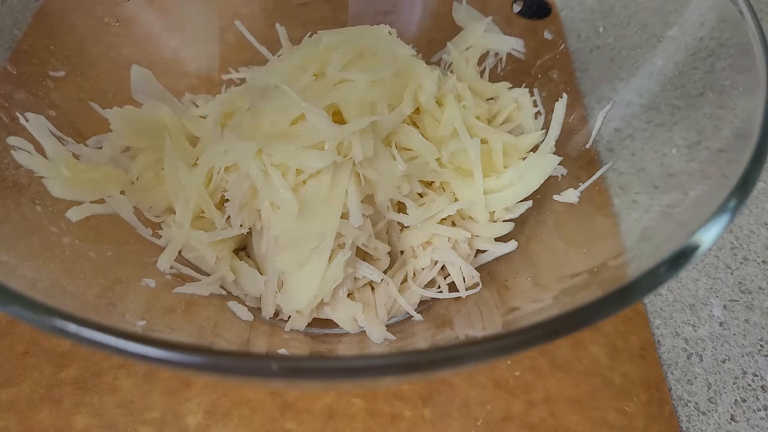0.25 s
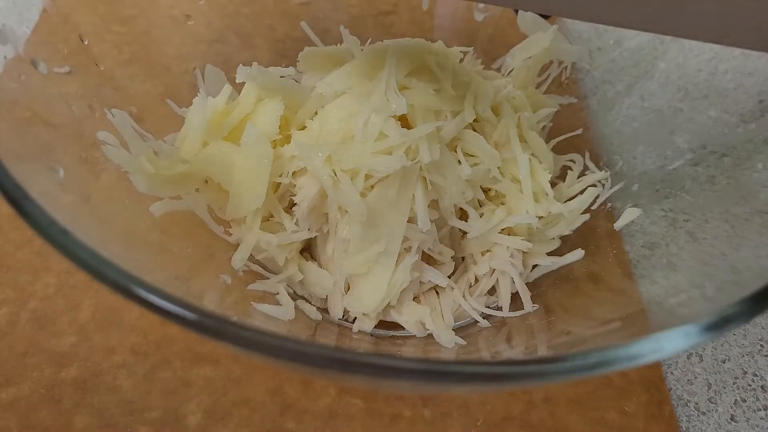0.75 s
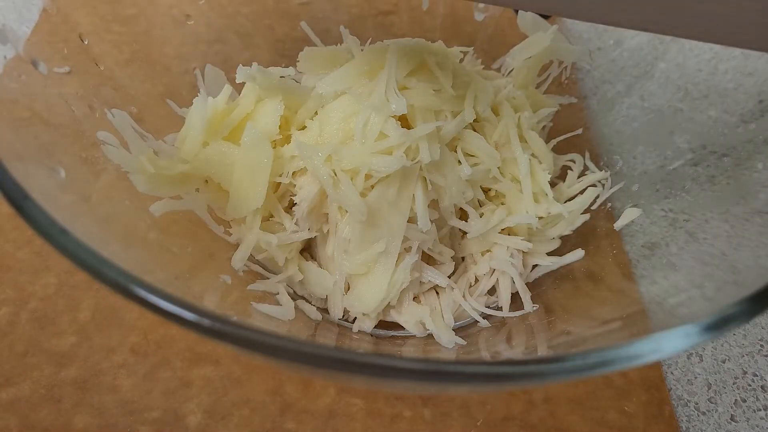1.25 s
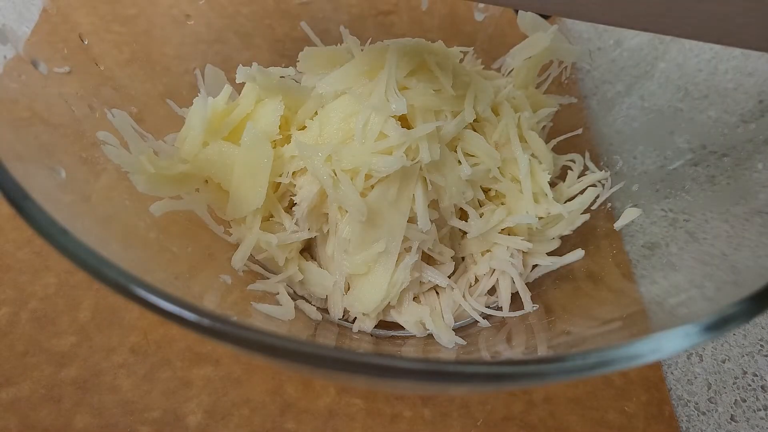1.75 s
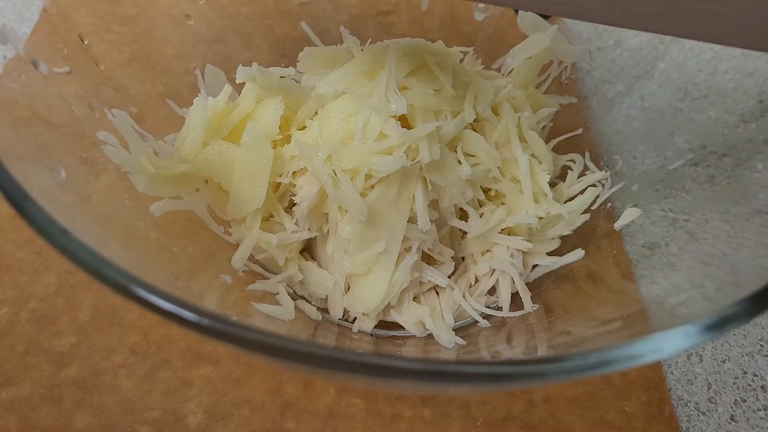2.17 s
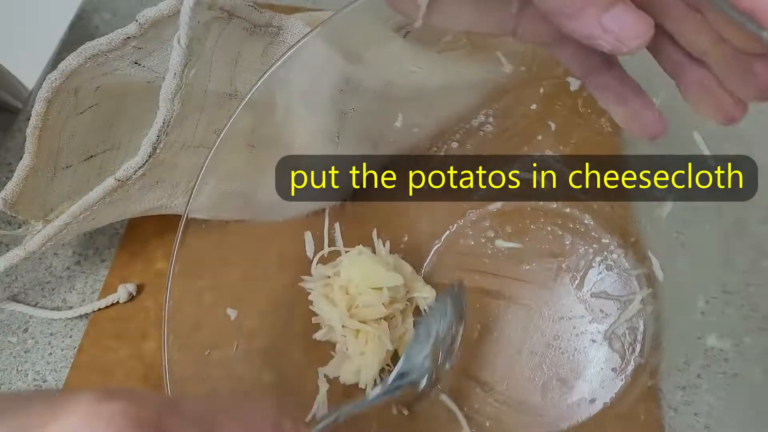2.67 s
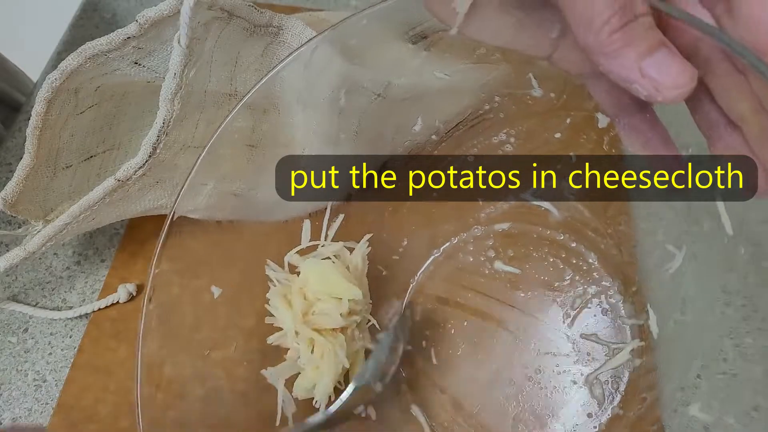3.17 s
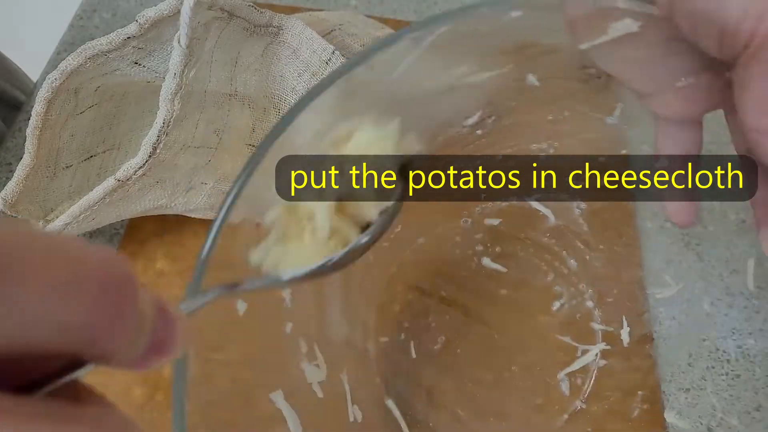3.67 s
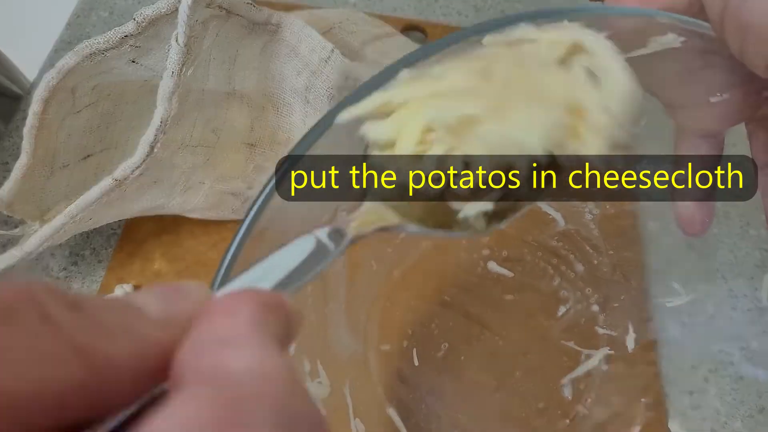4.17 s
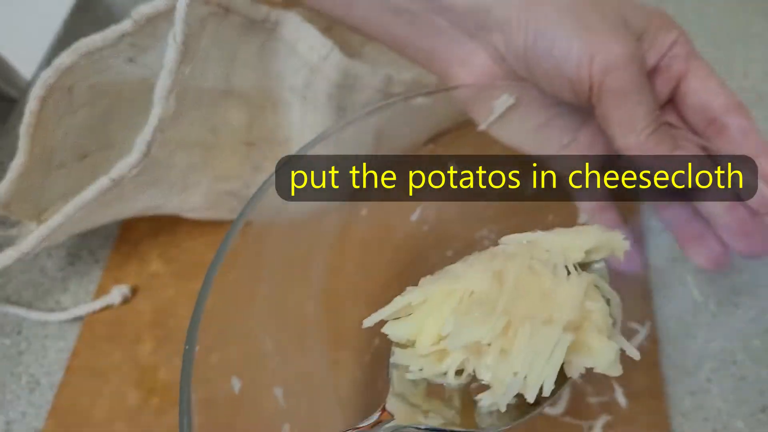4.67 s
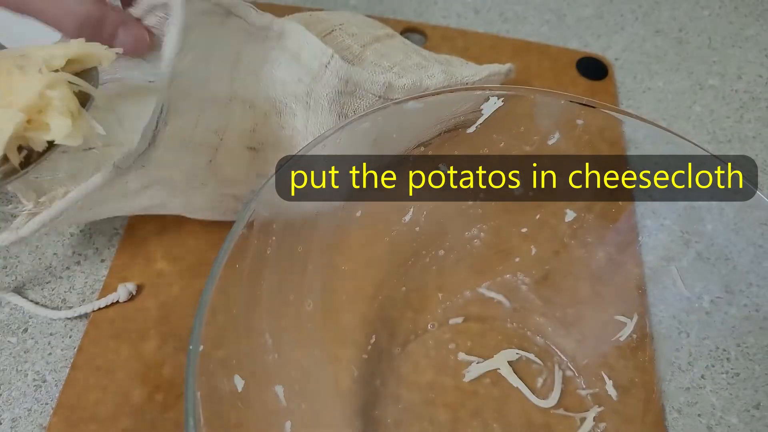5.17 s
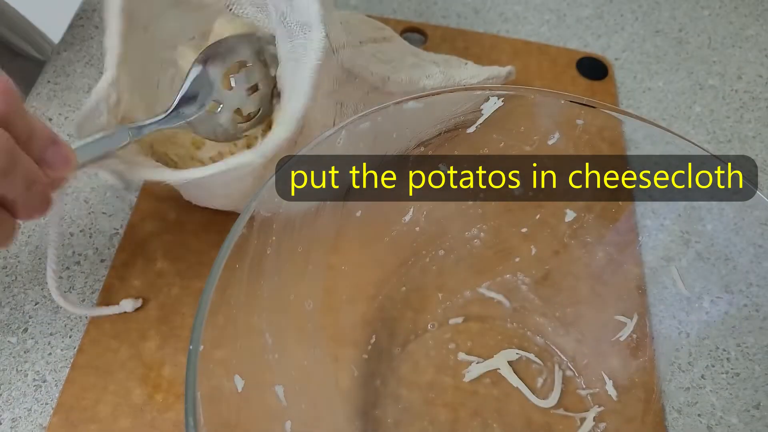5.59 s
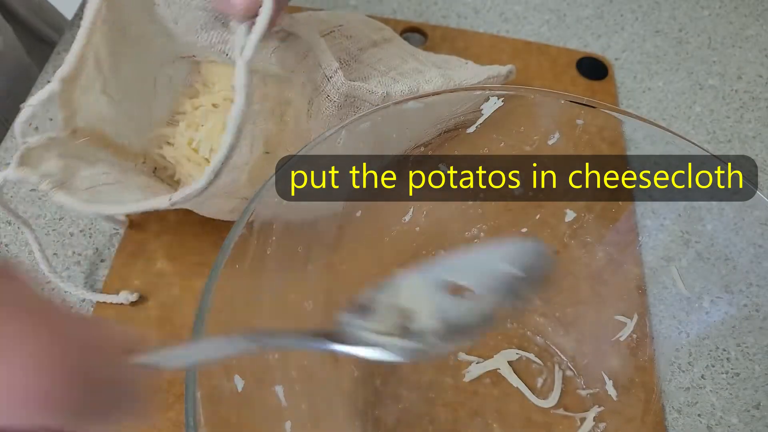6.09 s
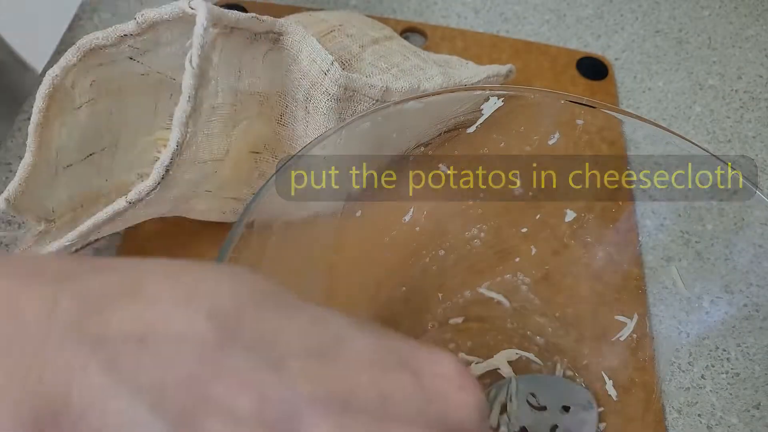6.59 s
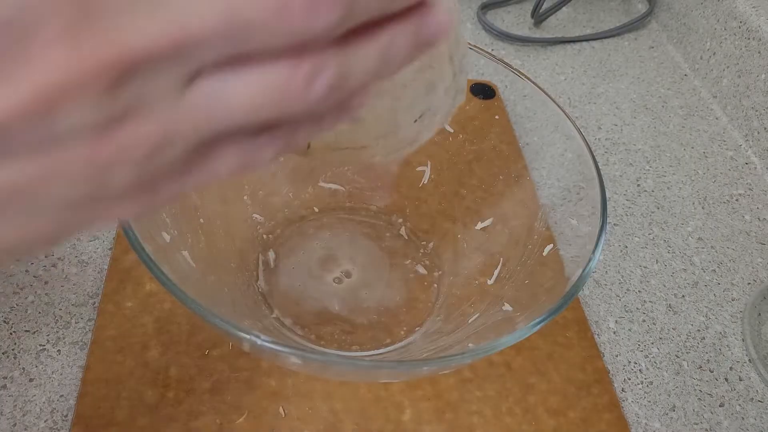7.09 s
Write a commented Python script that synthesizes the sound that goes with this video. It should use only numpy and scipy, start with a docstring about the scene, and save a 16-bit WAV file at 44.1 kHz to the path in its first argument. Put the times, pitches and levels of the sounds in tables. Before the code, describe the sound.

A very short run of quick, crisp potato-slicing strokes cuts off into quiet kitchen air with faint rustles and two tiny knocks. After a brief silence, a steel spoon taps sharply and scrapes in a glass bowl. The bowl drags over a wooden board and lands with a dull thud while water hisses softly. The spoon drops with a bright rattle, then faint drips. Close stereo microphone, small room.

```python
"""Quick slicer strokes, then near stillness; a steel spoon taps and scrapes a glass bowl on a wooden board,
the bowl is dragged and set down, a tap hisses and the spoon drops in; a quiet kitchen with drips ends it.
Steel, glass and wood are struck resonators. Blades, friction, clatter, water and air are shaped noise.
Three passages, each with its own air; a short silence parts the first two."""
import sys
import numpy as np
from scipy import signal
from scipy.fft import rfft, irfft, next_fast_len
from scipy.io import wavfile
from scipy.ndimage import uniform_filter1d

SR = 44100
rng = np.random.default_rng(int(sys.argv[2]) if len(sys.argv) > 2 else 0)


def to_wav(s):
    """Save 16-bit WAV."""
    ch = np.atleast_2d(s).T  # columns
    pcm = np.round(np.clip(ch, -1, 1) * 32767)  # PCM
    wavfile.write(sys.argv[1], SR, pcm.astype(np.int16))


def volts_from_decibels(level):
    """Turn decibel levels (scalar or array-like) into linear amplitude factors."""
    exponent = np.asarray(level, float) / 20
    return 10 ** exponent


N = 323694
T = np.arange(N) / SR

# The three passages. Each row: start in seconds, end in seconds.
PASSAGES = [(0, 2.172), (2.298, 6.72), (6.72, 7.4)]
# Stereo image of close sounds. Each row: frequency in Hz, left-right likeness from -1 to 1,
# left minus right in dB.
CLOSE_STEREO = [(120, 0.99, -3), (250, 0.88, -5), (453, -.1, 2), (960, -0.63, -0.5), (1350, -0.62, 3),
                (2000, -0.067, -1)]
# Stereo image with left and right nearly unrelated. Columns as above.
WIDE_STEREO = [(120, 0.09, -2), (2000, 0.0049, 0)]

# Kitchen air, one noise colour per passage. Each row: frequency in Hz, relative density in dB.
AIR_COLOURS = [
    [(12, -67), (25, -27), (113, -4.5), (181, -16.5), (227, -3), (326, -19), (364, -6), (602, -20),
     (1210, -25), (1790, -31.5), (1940, -19), (2110, -34.5), (2500, -23.5), (2790, -35), (15800, -53)],
    [(12, -40), (20, -10), (85, -0.5), (227, -9), (291, -5), (335, -26), (385, -8.5), (539, -7),
     (995, -14.5), (2300, -29), (15800, -44.5)],
    [(12, -43), (20, -16), (53, -7.5), (85, -7.5), (227, -9), (308, -21), (375, -13), (753, -9),
     (995, -19.5), (1890, -21), (4130, -38), (10400, -42.5), (15800, -53)],
]
# Level of that air in dB, one per passage.
AIR_LEVELS = [-55, -50, -49]
# Faint whistle of the first passage. Each row: frequency in Hz, relative level in dB,
# ring time (fall by 60 dB) in seconds, radians by which the left leads.
WHISTLE_MODES = [(9070, -46, .03, 0.98)]
# Slicer strokes. Each row: middle in seconds, level in dB.
STROKES = [(.003, -30.5), (.049, -31.5), (.095, -24), (.15, -28), (.188, -27), (.203, -25), (.225, -30.5),
           (.271, -29)]
# Colour of the blades. Each row: frequency in Hz, relative density in dB.
BLADE_COLOUR = [(180, -54.5), (300, -24), (391, -12), (439, -20.5), (633, -1), (747, -17.5), (1170, -8.5),
                (2160, -7), (3160, -3), (7600, -12), (8830, -9), (12500, -11), (15800, -16)]
# Rustles of hands and cloth. Each row: middle in seconds, level in dB, half length in seconds,
# centre in Hz, width in Hz (band edges are held within 200 to 16000 Hz).
RUSTLES = [(0.479, -65.5, .01, 2960, 2980), (0.792, -55, 0.032, 2600, 1000), (0.819, -52, .008, 2430, 2940),
           (1.305, -59, .005, 3200, 1500), (1.418, -56.5, 0.011, 2000, 1500), (1.601, -62, .01, 2300, 1000),
           (2.454, -62, .02, 8920, 7950), (5.19, -41, .014, 9000, 14100),
           (5.181, -53.5, 0.0055, 12760, 1200), (5.246, -41, .022, 5980, 11960),
           (5.24, -37, 0.0058, 12770, 1215), (7.268, -62.5, .03, 10930, 6000)]
# Small knocks. Each row: time in seconds, strike in dB, pitch in Hz, ring time in seconds.
KNOCKS = [(1.013, -36, 408, .045), (1.468, -39, 1955, .02)]
# Drips of juice into the bowl. Each row: time in seconds, strike in dB.
DRIPS = [(6.829, -37), (7.010, -42), (7.082, -43), (7.186, -42), (7.222, -44), (7.274, -42)]

# Resonances of the spoon's scoop, ringing free. Each row: frequency in Hz, relative level in dB,
# ring time in seconds, radians by which the left leads.
SCOOP_MODES = [(1340, -15, .12, 2.0), (3984, 0, .17, -.5), (5330, -26, .07, -0.5), (6515, -5, .14, 0.83),
               (7300, -17, 0.13, 3.5), (8400, -16, .14, -2), (10300, -17, .14, -2.5),
               (11360, -27.5, .1, 1.0), (12930, -27.5, .12, 2)]
# Resonances of the spoon's handle, the bowl's rim and the bowl's base. Columns as for the scoop.
HANDLE_MODES = [(6230, 1.5, 0.076, 4), (8690, -8, 0.12, 1.7), (8840, -0.5, 0.09, 0), (9230, -2, .07, 3.65),
                (10200, -15, .12, -5.9), (11740, -14, .1, -5.5), (12660, -10, .06, 0.9),
                (13590, -16, .1, -3.5)]
RIM_MODES = [(2322, 1.5, 0.11, 1.2), (2300, -14, .2, 1.5), (3305, -11, .16, -1.5), (4322, -12, 0.2, 1.5),
             (5545, -15, 0.18, 0), (6900, -12.5, .2, 3), (7360, -15, .17, -0.5), (8170, -13.5, 0.18, 1)]
BASE_MODES = [(405, -12, .15, -1.83), (614.7, 7.5, 0.045, 1.65), (900, -4, 0.025, -1.8),
              (1191, -5, 0.043, -1), (1314, 0, .07, 3.5), (1720, -11.5, .05, 2.13), (2070, -17, .03, 1)]
# Resonances of the wooden board, before any damping by the hand. Columns as for the scoop.
BOARD_MODES = [(57, -4, 0.18, .1), (99, -6, .1, .1), (122, 3, .17, 0.53), (188, -12.5, 0.11, 0.21),
               (249.8, -10, .07, .1), (330, -6, .07, -0.1)]
# The whole bowl, woken only when it lands. Columns as for the scoop.
WHOLE_BOWL_MODES = [(428, -17, .8, -1.6)]
# Squeak of the scoop's edge. Columns as for the scoop.
SQUEAK_MODES = [(1350, 0, .03, -.3), (2000, -2, .03, 2.0), (2600, 0, .02, 2.0), (4450, -9, .02, -.3),
                (5600, -13, .02, -.9)]
# The pressed or loaded scoop: free from seconds, free until seconds, pitch of its main mode when
# pressed in Hz, share of ring time when pressed, muffling once loaded in dB.
PRESSED_SCOOP = (3.0, 3.4, 4064, .55, -10)
# Spoon taps. Each row: time in seconds, then drive of crack, scoop and base in dB.
TAPS = [(2.3033, -63, -60, -64), (2.4153, -58, -63, -45), (2.4564, -52, -48, -36), (2.6678, -9, -19, -17.5),
        (2.7571, -16, -12, -24.5), (2.8282, -26, -36, -46), (2.8453, -6, -34, -23),
        (3.1234, -9.5, -22, -20.5), (3.1882, -1, -11, -22), (3.4629, -12, -41, -29),
        (3.5581, -58, -64, -65), (3.6194, -50, -62, -70), (3.6671, -58, -60, -65),
        (3.7141, -54, -49.5, -61), (3.7992, -40.5, -44.5, -59)]
# Colour of contact cracks and friction. Each row: frequency in Hz, relative density in dB.
CRACK_COLOUR = [(200, -20), (600, -7.5), (1400, -2), (2800, -7), (6500, -20), (10000, -34), (16000, -46)]
# Colour of the treble tick. Each row: frequency in Hz, relative density in dB.
TICK_COLOUR = [(3000, -30), (6800, 0), (10500, -6), (16000, -24)]
# Scrapes on wet glass. Each row: peak in seconds, drive of the ring in dB, friction in dB,
# fading in dB per second.
SCRAPES = [(2.338, -65, -72, 600), (2.456, -64, -64, 250), (2.86, -50, -40, 400), (2.9, -50, -52, 400),
           (3.14, -46, -42, 200), (3.186, -42, -36, 500), (3.49, -76, -48, 200), (3.628, -62, -65, 200),
           (3.72, -66, -64, 200), (3.806, -61, -55, 250), (4.182, -68, -44, 350), (4.4, -64, -47, 200),
           (4.485, -62, -44, 120), (4.545, -64, -48, 300)]
# One squeak: middle in seconds, drive in dB, half length in seconds.
SQUEAK = (4.182, -61, .013)
# Low rumble while the hands work. Each row: time in seconds, level in dB.
RUMBLE_LEVEL = [(2.3, -70), (2.7, -58), (2.86, -50), (3.15, -58), (3.4, -47), (3.85, -50), (4.13, -60),
                (4.4, -42), (4.7, -52), (5.1, -53), (5.55, -62), (5.82, -51), (6.0, -66), (6.5, -60),
                (6.72, -65)]
# Bowl dragged over the board: peak in seconds, level in dB, rise and fall in dB per second,
# average slips per second.
DRAG = (4.39, -29, 105, 60, 95)
# Bowl set down: time in seconds, then base, board and dull rush in dB, rush fading time in seconds.
SET_DOWN = (4.7228, -13, -9.5, -19, .025)
# Colour of the dull rush. Each row: frequency in Hz, relative density in dB.
RUSH_COLOUR = [(150, -18), (400, -1), (700, 2.5), (1500, -6), (3400, -19), (4500, -39), (9000, -60)]
# Tap in the sink: fully open at seconds, closing from seconds, level in dB, opening and closing
# in dB per second.
TAP_FLOW = (4.68, 5.3, -47, 85, 9)
# Colour of the water. Each row: frequency in Hz, relative density in dB.
STREAM_COLOUR = [(590, -24.5), (1000, -4), (1120, -13), (1350, 1), (1550, -8), (2270, -4), (2550, -8.5),
                 (3400, -4.5), (4430, -8.5), (12700, -5), (15800, -16.5)]
# Spoon drops and bounces. Each row: time in seconds, then drive of handle, rim and base in dB.
DROPS = [(6.388, -17, -29, -19), (6.399, -14, -28, -18), (6.536, -42, -42, -55), (6.545, -29, -28, -45),
         (6.552, -10, -7, -28), (6.575, -16.5, -20, -35)]
# Colour of steel clattering on glass. Each row: frequency in Hz, relative density in dB.
CLATTER_COLOUR = [(500, -31.5), (1400, -9), (3300, -5), (4700, -9), (6300, 0), (7900, -9.5), (9200, -6),
                  (13000, -9), (16000, -15.5)]


def column(table, count, at, bend=np.asarray):
    """Reads one column of a table at the places `at`, straight between rows on the bent axis."""
    table = np.array(table, float)
    return np.interp(bend(at), bend(table[:, 0]), table[:, count])


def gain_curve(table, count):
    """Turns a dB column into gain, silent outside its span."""
    return volts_from_decibels(column(table, count, T)) * (T >= table[0][0]) * (T <= table[-1][0])


def walk(rate):
    """Slow chance with spread near 1: random steps at `rate` per second, smoothed twice."""
    k = int(SR / rate)
    steps = np.repeat(rng.standard_normal(N // k + 1), k)
    return 1.3 * uniform_filter1d(uniform_filter1d(steps, k), k)[:N]


def hump(s, half):
    """A bell-shaped swell."""
    return np.exp(-.5 * ((T - s) / half) ** 2)


def swell(start, end, db, rise_db, fall_db):
    """A level that climbs to `start`, holds to `end` and sinks, straight in dB per second."""
    return volts_from_decibels(db - rise_db * np.maximum(start - T, 0) - fall_db * np.maximum(T - end, 0))


def noise(colour, stereo, flicker_db=0.):
    """Coloured stereo noise of rms 1; with flicker, each octave wavers on its own."""
    size = next_fast_len(N)
    hz = np.maximum(np.arange(size // 2 + 1) * SR / size, 1)
    like = np.clip(column(stereo, 1, hz, np.log), -1, 1)
    lean = volts_from_decibels(column(stereo, 2, hz, np.log) / 2)
    a, b = rfft(rng.standard_normal((2, size)))
    left = a * lean
    right = (like * a + np.sqrt(1 - like ** 2) * b) / lean
    pair = np.array([left, right]) * volts_from_decibels(column(colour, 1, hz, np.log))
    if flicker_db:
        octave = np.clip(np.log2(hz / 60), 0, 8)
        out = np.zeros((2, N))
        for k in range(9):
            band = pair * np.clip(1 - abs(octave - k), 0, 1)  # overlapping octaves sum to the whole
            out += irfft(band, size)[:, :N] * volts_from_decibels(flicker_db * walk(9.9))
    else:
        out = irfft(pair, size)[:, :N]
    return out / out.std()


def ring(push, modes):
    """Damped resonators driven by a push, each with its own phase and balance left and right."""
    out = np.zeros((2, len(push)))
    for hz, db, t60, lead in modes:
        pole = np.exp((2j * np.pi * hz - np.log(1000) / t60) / SR)
        z = signal.lfilter([volts_from_decibels(db)], [1, -pole], push)
        lean = np.log(volts_from_decibels(column(CLOSE_STEREO, 2, hz, np.log))) + 1j * lead
        out += (z * np.exp(.5 * lean * np.array([[1], [-1]]))).imag
    return out


def blows(times, levels_db, contact_s):
    """Contact pushes and their envelopes: a first touch, then chatter that dies over the contact time."""
    push, shape = np.zeros((2, N + SR))
    fade = np.exp(-np.arange(SR // 5) / SR / contact_s)
    chatter_share = .3  # of each push's unit energy, before its level
    for s, db in zip(times, levels_db):
        chatter = fade * rng.standard_normal(len(fade))
        chatter *= np.sqrt(chatter_share / np.sum(chatter ** 2))
        chatter[0] = np.sqrt(1 - chatter_share)
        at = slice(int(s * SR), int(s * SR) + len(fade))
        push[at] += volts_from_decibels(db) * chatter
        shape[at] += volts_from_decibels(db) * fade
    return push[:N], shape[:N]


def soften(push):
    """Thick glass and wood take blows without treble."""
    return signal.sosfilt(signal.butter(3, 3300, fs=SR, output="sos"), push)


def room(x, db=-17):
    """Kitchen tail: fading noise, the treble fading sooner, unrelated left and right."""
    t = np.arange(SR // 2) / SR
    low_t60_s, high_t60_s = 0.37, 0.3
    low, high = rng.standard_normal((2, 2, len(t)))
    low = signal.sosfilt(signal.butter(2, [250, 2500], "band", fs=SR, output="sos"), low)
    high = signal.sosfilt(signal.butter(2, 2500, "high", fs=SR, output="sos"), high)
    tail = low * 1000 ** (-t / low_t60_s) + high * 1000 ** (-t / high_t60_s)
    tail *= np.minimum(t / .004, 1)
    tail /= np.sqrt(np.sum(tail ** 2) / 2)
    return x + volts_from_decibels(db) * signal.fftconvolve(x, tail, axes=1)[:, :N]


def kitchen_air():
    """Steady coloured noise for each passage, its octaves wavering slightly."""
    images = (WIDE_STEREO, CLOSE_STEREO, CLOSE_STEREO)
    return [volts_from_decibels(db) * noise(colour, stereo, flicker_db=0.5)
            for colour, db, stereo in zip(AIR_COLOURS, AIR_LEVELS, images)]


def faint_whistle():
    """A narrow resonator kept sounding by noise."""
    return volts_from_decibels(-60) * ring(rng.standard_normal(N), WHISTLE_MODES)


def slicer():
    """Each stroke tears the potato over the blades in a grainy burst; the sound cuts off after the last."""
    strokes = sum(volts_from_decibels(db) * hump(s, .0085) for s, db in STROKES)
    grain = volts_from_decibels(2.0 * walk(700))
    return room(noise(BLADE_COLOUR, WIDE_STEREO) * strokes * grain, db=-32) * (T < .302)


def rustles():
    """Hands and cloth rub in short swells of band noise."""
    out = np.zeros((2, N))
    for s, db, half, hz, width_hz in RUSTLES:
        edges = np.clip([hz - width_hz / 2, hz + width_hz / 2], 200, 16000)
        band = signal.butter(2, edges, "band", fs=SR, output="sos")
        at = abs(T - s) < 4 * half
        hiss = signal.sosfilt(band, rng.standard_normal((2, at.sum())))
        out[:, at] += volts_from_decibels(db) * hiss / hiss.std() * hump(s, half)[at]
    return out


def knocks_and_drips():
    """A short contact rings one pitch and a weaker, shorter overtone near its octave."""
    out = np.zeros((2, N))
    drip_hz, drip_t60_s = 772, .05
    for s, db, hz, t60 in KNOCKS + [(s, db, drip_hz, drip_t60_s) for s, db in DRIPS]:
        modes = [(hz, 0, t60, 2.5), (2.04 * hz, -8, t60 / 2, -1.5)]
        out += ring(blows([s], [db], 0.0018)[0], modes)
    return out


def spoon_taps_and_scrapes():
    """Taps and wet friction drive scoop, bowl and board; the pressed or loaded scoop rings higher and shorter."""
    s, crack, scoop, base = np.transpose(TAPS)
    # tick and board thud grow slower than the crack
    tick, thud = -38 + .36 * crack, -38 + .17 * crack
    contact_s = 0.0023

    rub = rng.standard_normal(N) * volts_from_decibels(3.0 * walk(60))
    rise_db_per_s = 1100
    slide = sum(swell(at, at, db, rise_db_per_s, fall) for at, db, _, fall in SCRAPES)
    friction = sum(swell(at, at, db, rise_db_per_s, fall) for at, _, db, fall in SCRAPES)

    free, full, pressed_hz, share, full_db = PRESSED_SCOOP
    pressed_modes = [(pressed_hz if k == 1 else hz, db, share * t60, lead)
                     for k, (hz, db, t60, lead) in enumerate(SCOOP_MODES)]
    loose = (T > free) & (T < full)
    steel = blows(s, scoop, contact_s)[0] + volts_from_decibels(-19) * rub * slide
    steel *= np.where(T > full, volts_from_decibels(full_db), 1)
    out = ring(steel * ~loose, pressed_modes) + ring(steel * loose, SCOOP_MODES)

    middle, squeak_db, half = SQUEAK
    out += ring(volts_from_decibels(squeak_db) * rub * hump(middle, half), SQUEAK_MODES)
    out += ring(soften(blows(s, base, contact_s)[0]), BASE_MODES)
    out += ring(soften(blows(s, thud, contact_s)[0]), BOARD_MODES)

    crack_level = blows(s, crack - 4, contact_s)[1] + friction * volts_from_decibels(2.5 * walk(150))
    out += noise(CRACK_COLOUR, CLOSE_STEREO) * crack_level
    bright_slide = volts_from_decibels(4.0 * walk(80) - 1.5) * slide * (T > full)
    out += noise(TICK_COLOUR, WIDE_STEREO) * (blows(s, tick, .006)[1] + bright_slide)
    return out


def work_rumble():
    """Low noise that wavers and follows the working hands."""
    colour = [(20, -12.5), (45, -2), (120, -1.5), (200, -33), (400, -55)]  # Hz, relative dB
    return noise(colour, CLOSE_STEREO) * volts_from_decibels(2.5 * walk(12)) * gain_curve(RUMBLE_LEVEL, 1)


def bowl_drag():
    """The bowl's foot sticks and slips in uneven jerks; the hand on it shortens the board's ring."""
    s, db, rise_db, fall_db, rate = DRAG
    strength = swell(s, s, db, rise_db, fall_db) * (T < 4.56)
    phase = np.cumsum(rate * (1 + .22 * walk(70))) / SR
    slips = np.diff(np.floor(phase), prepend=0) * volts_from_decibels(3.0 * walk(90)) * strength
    damped_board = [(hz, db, .35 * t60, lead) for hz, db, t60, lead in BOARD_MODES]
    rush = noise(RUSH_COLOUR, CLOSE_STEREO) * volts_from_decibels(-20 + 3.0 * walk(90)) * strength
    return ring(slips, damped_board) + rush


def bowl_set_down():
    """One softened impact wakes the whole bowl, its base and the board, with a dull rush of noise."""
    s, base_db, board_db, rush_db, rush_s = SET_DOWN
    impact = soften(1.0 * (np.arange(N) == int(s * SR)))
    out = ring(volts_from_decibels(base_db) * impact, WHOLE_BOWL_MODES + BASE_MODES)
    out += ring(volts_from_decibels(board_db) * impact, BOARD_MODES)
    return out + noise(RUSH_COLOUR, CLOSE_STEREO) * blows([s], [rush_db], rush_s)[1]


def tap_water():
    """The tap hisses as wavering noise, opened fast and closed slowly."""
    return noise(STREAM_COLOUR, WIDE_STEREO, flicker_db=1.2) * volts_from_decibels(1.5 * walk(250)) * swell(*TAP_FLOW)


def swarm(push, count):
    """Many small modes of loose steel on glass, scattered by chance, each with its own phase left and right."""
    t = np.arange(SR // 4)[:, None] / SR
    place, spread, left, right = rng.random((count, 4)).T
    hz = 1200 + 14000 * place
    t60_s = .2 * (.4 + spread)
    fade = volts_from_decibels(column(CLATTER_COLOUR, 1, hz, np.log)) * 1000 ** (-t / t60_s)
    # the random phases cover the full circle
    modes = [np.sum(fade * np.sin(2 * np.pi * hz * t + 2 * np.pi * turn), axis=1) for turn in (left, right)]
    return volts_from_decibels(-14) * signal.fftconvolve(push[None], np.array(modes), axes=1)[:, :N]


def spoon_drops():
    """The falling spoon rattles: handle, scoop, rim, base and board ring under a steel clatter."""
    s, handle, rim, base = np.transpose(DROPS)
    clatter = (handle + rim) / 2 - 1
    thump = (handle + base) / 2 - 8

    def rattle(db):
        """Pushes of the drops and bounces."""
        return blows(s, db, 0.0096)[0]

    out = ring(rattle(handle - 28), SCOOP_MODES) + swarm(rattle(clatter), count=150)
    out += ring(rattle(handle), HANDLE_MODES) + ring(rattle(rim), RIM_MODES)
    out += ring(soften(rattle(base)), BASE_MODES)
    out += ring(soften(rattle(thump)), BOARD_MODES[:4])
    clatter_level = blows(s, clatter - 4, .016)[1] * volts_from_decibels(2.9 * walk(300))
    return out + noise(CLATTER_COLOUR, WIDE_STEREO) * clatter_level


def spoon_and_bowl():
    """Everything played on spoon, bowl and board; small things radiate no deep bass."""
    out = spoon_taps_and_scrapes() + bowl_drag() + bowl_set_down() + spoon_drops()
    return signal.sosfilt(signal.butter(2, 42, "high", fs=SR, output="sos"), out)


def scene():
    """Three passages, each with its own air; a short silence parts the first two."""
    first, second, third = ((T >= a) & (T < b) for a, b in PASSAGES)
    air = kitchen_air()
    small = room(rustles() + knocks_and_drips())
    work = room(spoon_and_bowl()) + work_rumble() + tap_water()
    opening = air[0] + faint_whistle() + slicer() + small
    return first * opening + second * (air[1] + small + work) + third * (air[2] + small)


def top_cut(x):
    """Nothing passes above the cut-off."""
    return signal.sosfilt(signal.butter(12, 15920, fs=SR, output="sos"), x)


def record(dry):
    """Peaks beyond full scale clip."""
    mix = np.clip(dry, -1, 1)
    return top_cut(mix)


dry = scene()
out = record(dry)
to_wav(out)
```